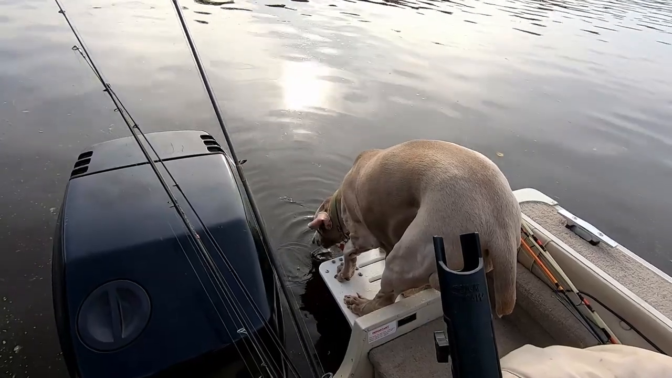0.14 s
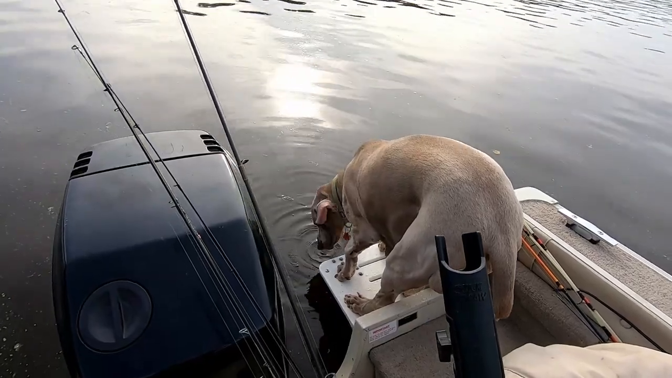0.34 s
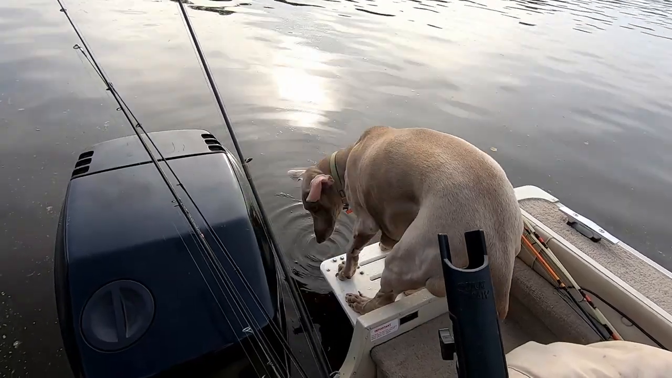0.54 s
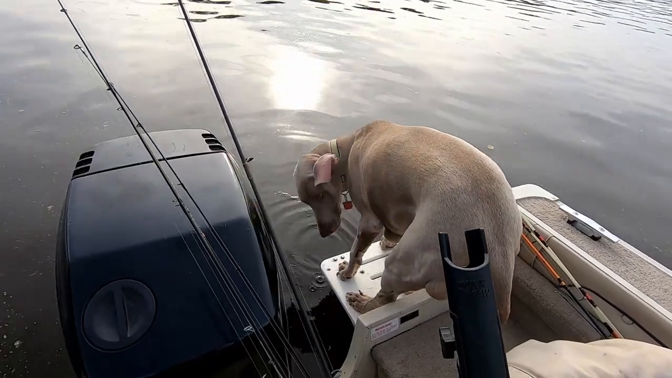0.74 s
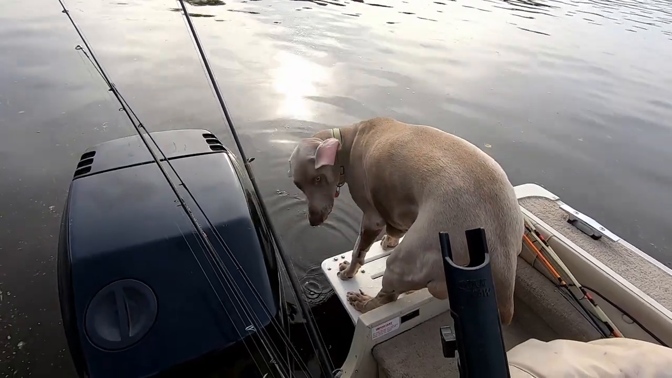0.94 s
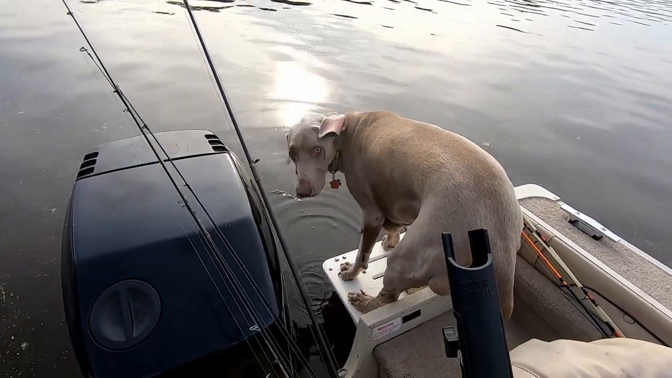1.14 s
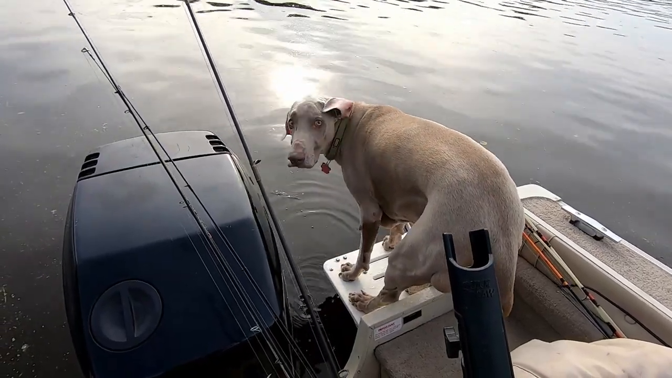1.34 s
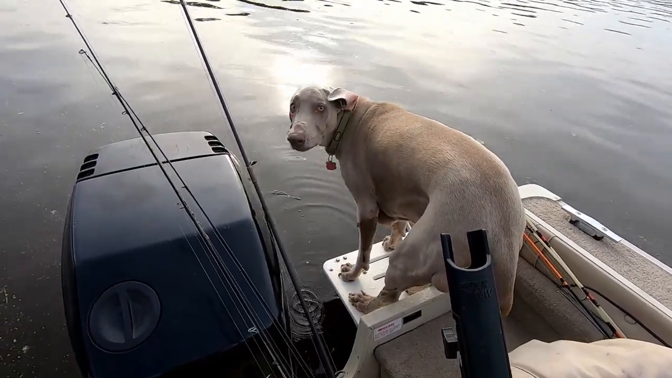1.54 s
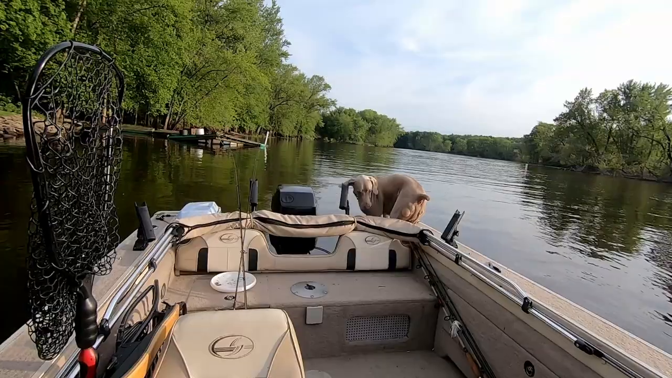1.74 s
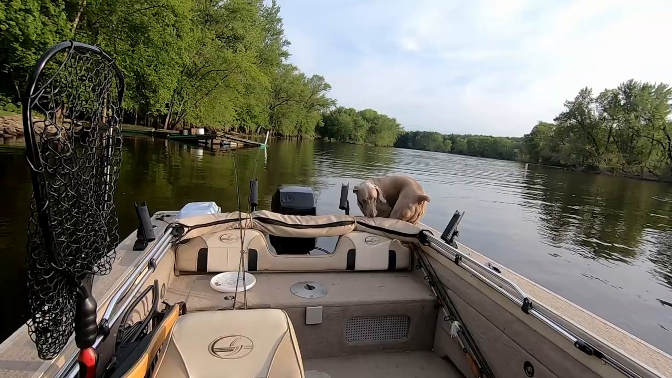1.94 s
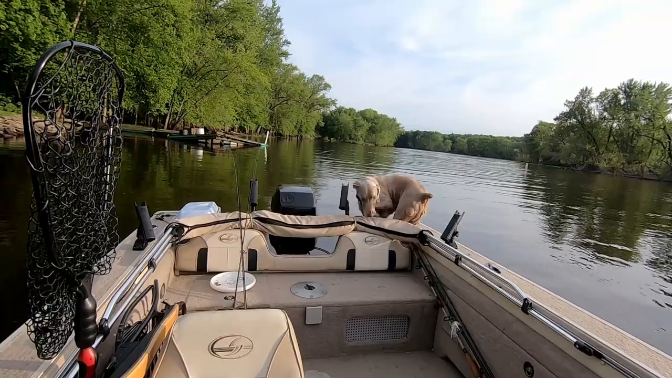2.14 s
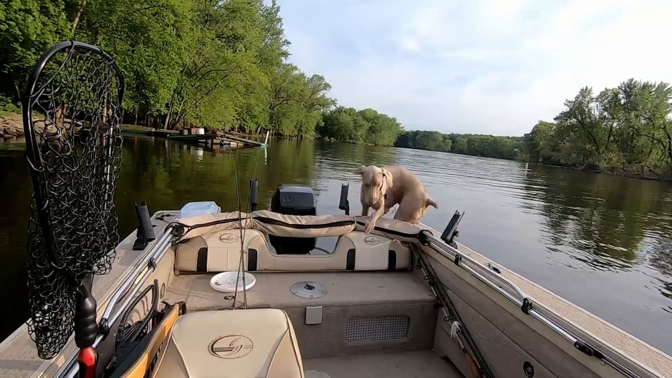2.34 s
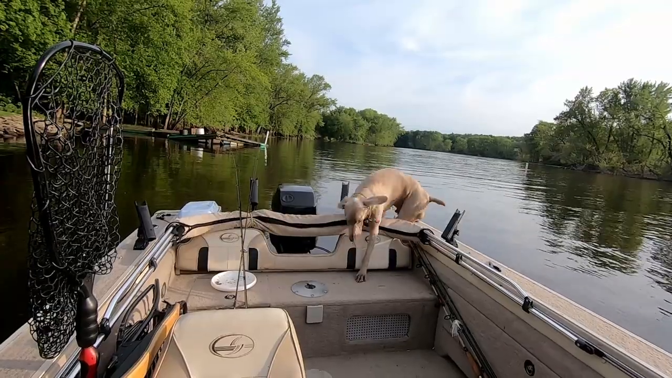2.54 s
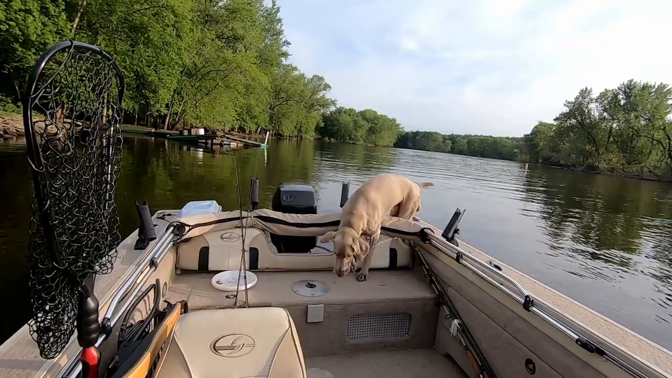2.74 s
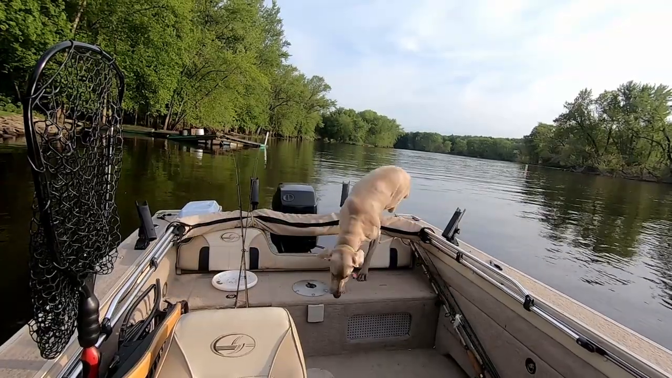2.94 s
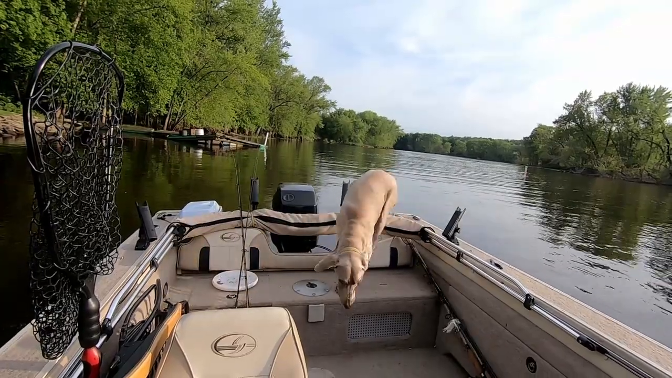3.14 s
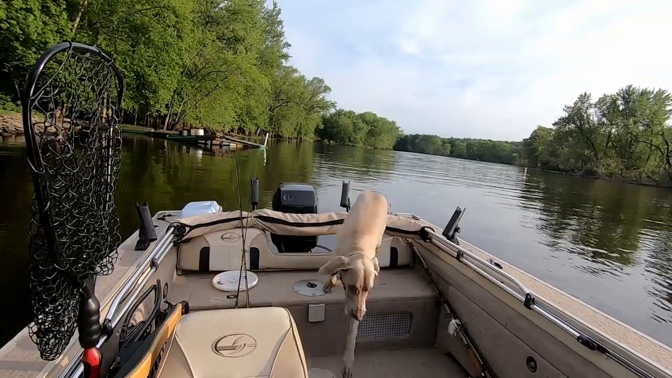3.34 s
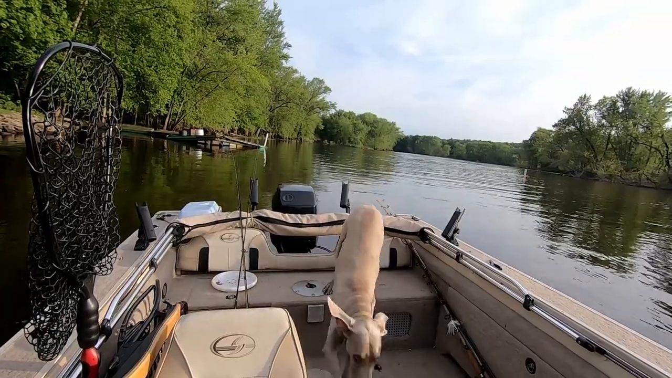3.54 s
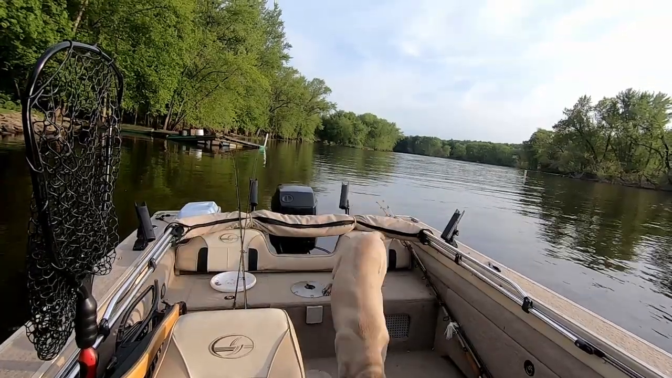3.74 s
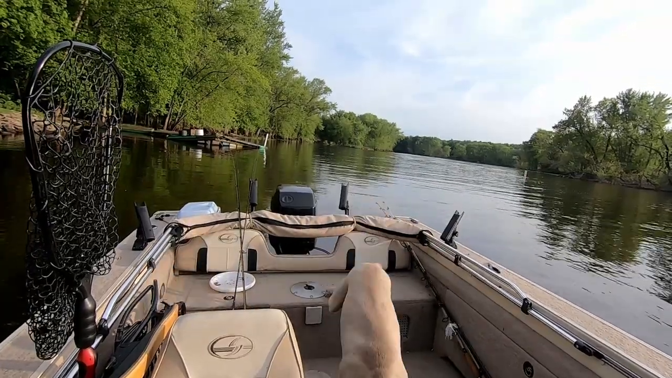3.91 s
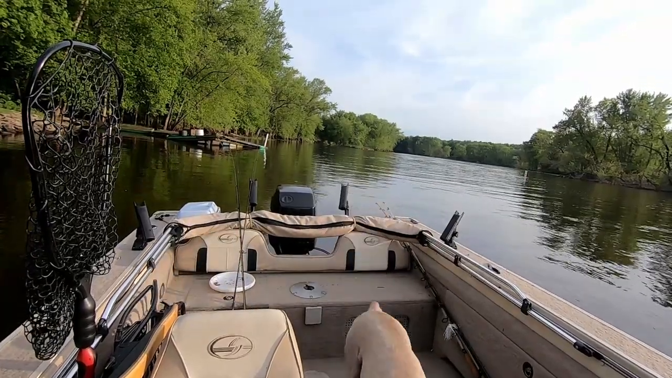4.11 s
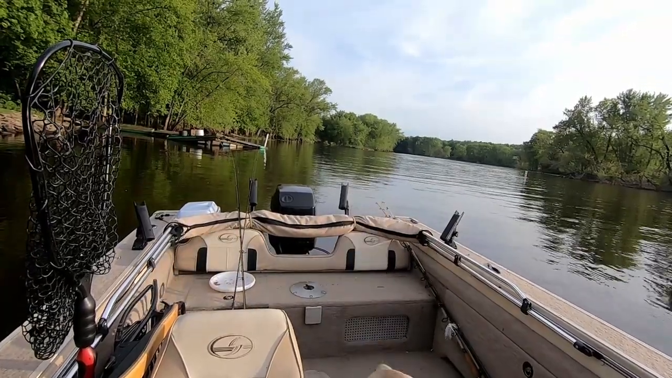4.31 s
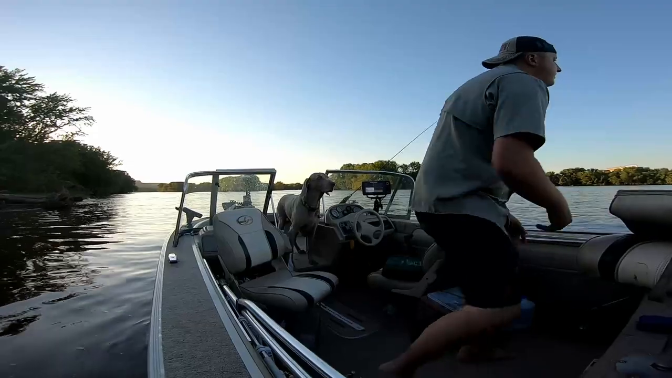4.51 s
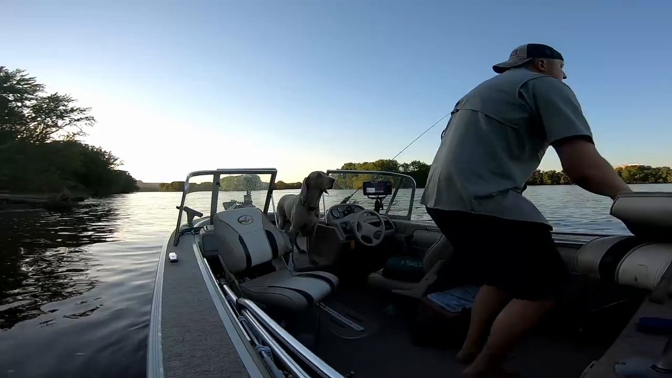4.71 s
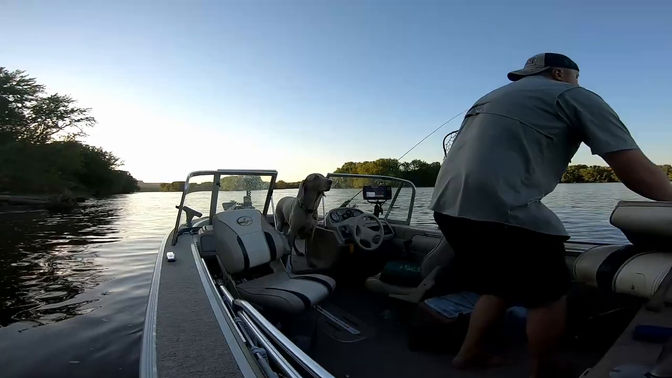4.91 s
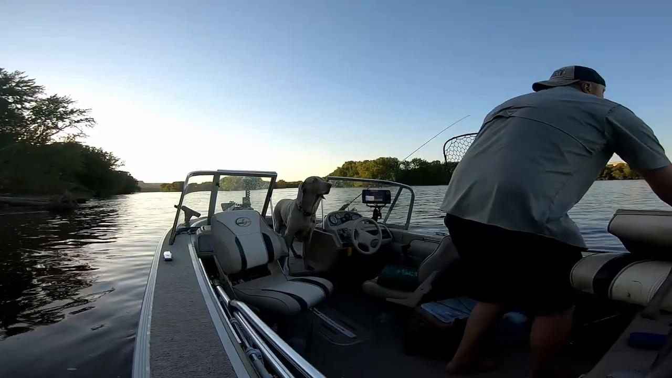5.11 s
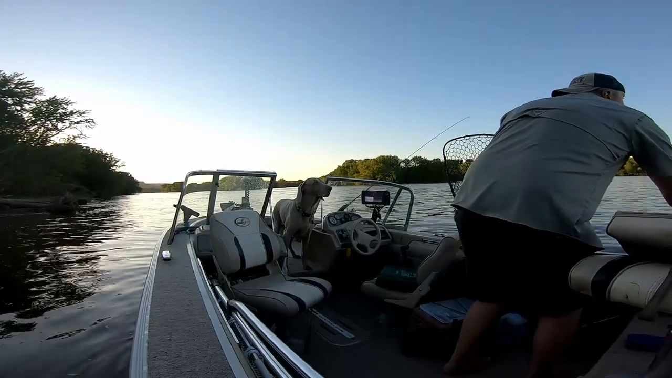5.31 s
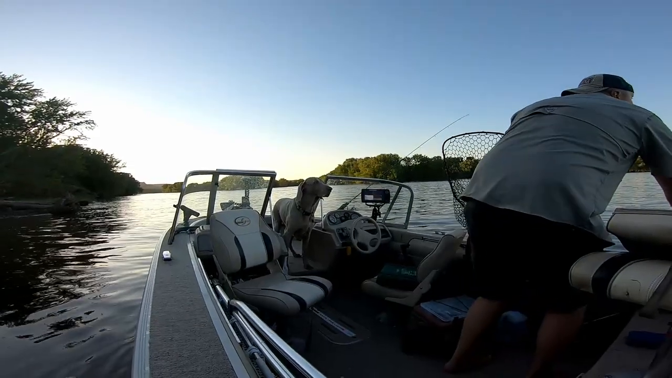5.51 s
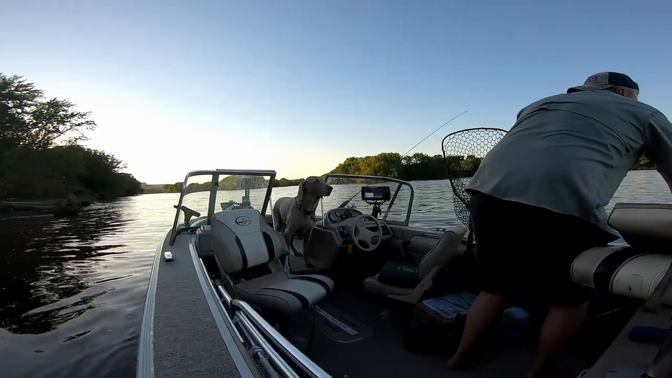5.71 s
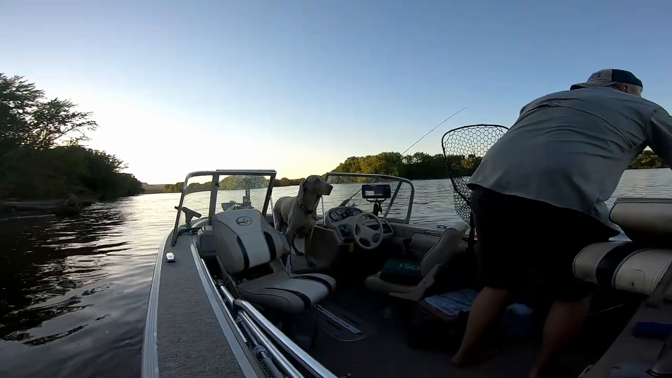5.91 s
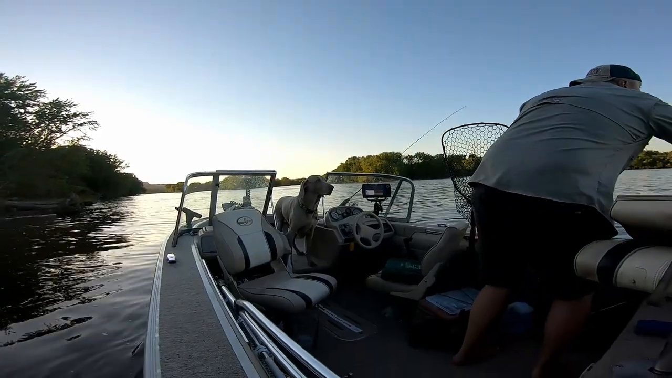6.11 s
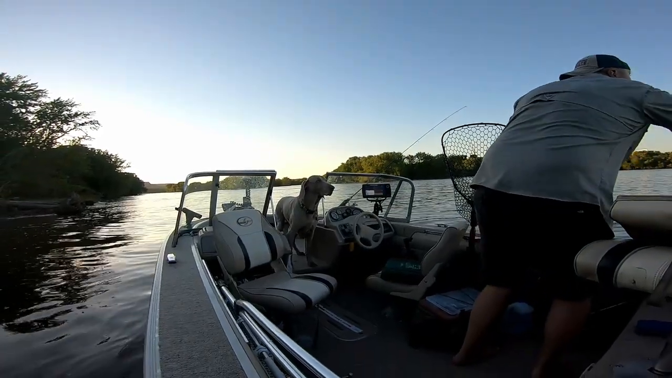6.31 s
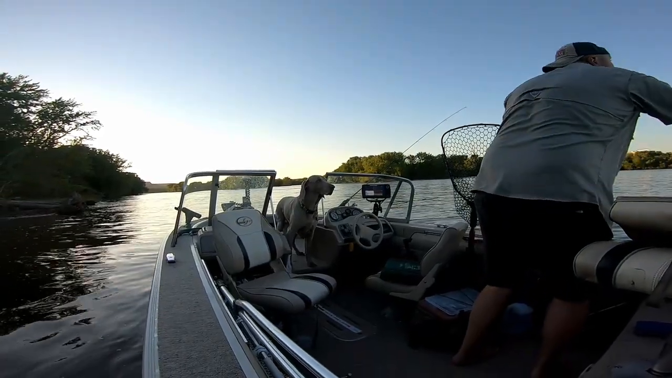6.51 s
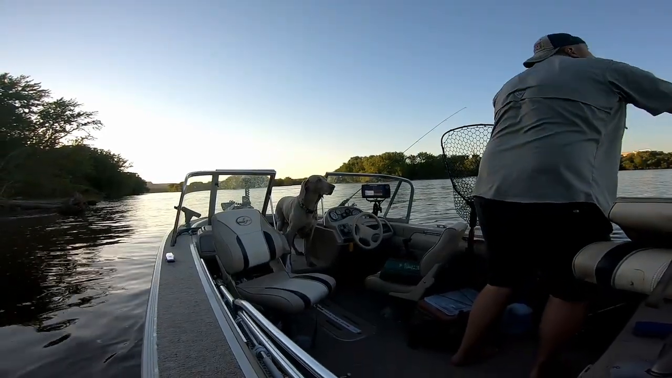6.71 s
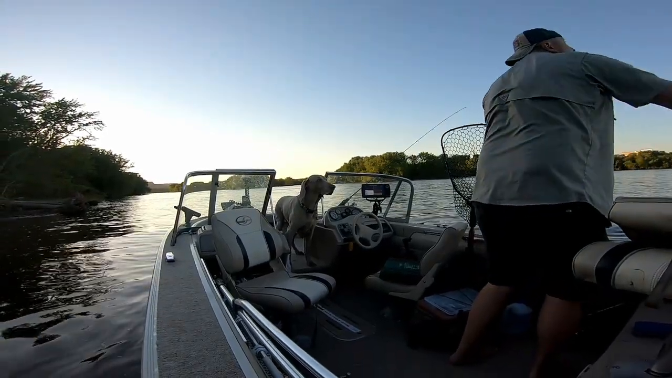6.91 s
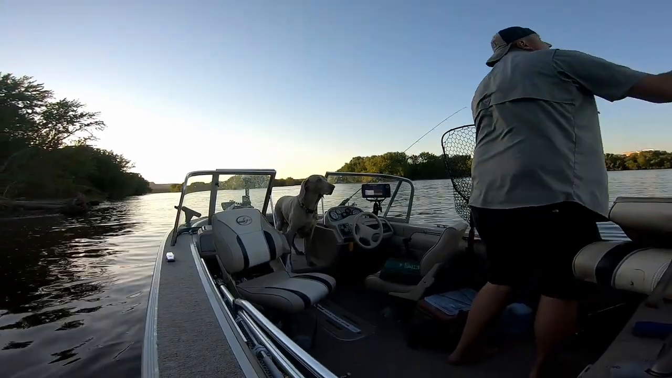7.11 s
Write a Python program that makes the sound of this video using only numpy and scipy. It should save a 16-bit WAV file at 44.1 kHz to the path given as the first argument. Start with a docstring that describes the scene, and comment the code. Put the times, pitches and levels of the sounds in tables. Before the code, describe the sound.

Three outdoor passages joined by hard cuts: small wet bubbles and ticks near a distant-sounding idling motor; a dog jumping down and clattering across hollow boards, tags jingling, paws thumping, with faint birdsong to the right; finally a steady, bassy engine idle, much louder and nearly mono, with a few barely audible gear ticks. Close on-board microphone, little reverberation.

```python
"""A small boat on a river, heard from on board in three passages that follow each other directly.
First a dog laps and drips at the stern (sine bubbles, noise ticks) over an idling outboard (wandering orders).
Then it scrabbles down the deck: noise-and-ring claws, paws on the deck's modes, scrapes and ringing collar tags,
with gliding-sine birds on the banks, insects of narrow noise and a sub-bass lurching of the hull.
Last a louder, closer idle drums through the hull. Shaped noise makes the air, water and hull behind each."""
import sys
import numpy as np
from scipy import signal
from scipy.fft import rfft, irfft
from scipy.io import wavfile
from scipy.ndimage import uniform_filter1d

SR = 44100
rng = np.random.default_rng(int(sys.argv[2]) if len(sys.argv) > 2 else 0)


def put_to_file(sound):
    """Save the sound as 16-bit audio at rate SR, in the file named by the first command-line argument."""
    columns = np.atleast_2d(sound).T  # one column per channel
    safe = np.clip(columns, -1, 1)
    whole_steps = np.round(safe * 32767)
    wavfile.write(sys.argv[1], SR, whole_steps.astype(np.int16))


def convert_level_to_amplitude(level_db):
    """Map a level in decibels to its linear amplitude factor."""
    exponent = np.asarray(level_db, float) / 20
    return 10 ** exponent


N = 315315  # samples

# Bounds of the three passages: times in seconds.
PASSAGES = (0, 1.613, 4.442, 7.15)


def evened(x):
    """Scales to rms 1."""
    return x / np.sqrt(np.mean(x ** 2) + 1e-20)


def read(points, hz):
    """Reads a spectrum on a log-frequency axis."""
    f, value = np.transpose(points)
    return np.interp(np.log(hz + 1), np.log(f + 1), value)


def span(rows, start=None, stop=None):
    """Start time, time axis and columns of a curve, at sample rate."""
    s, *columns = np.transpose(rows)
    start = s[0] if start is None else start
    stop = s[-1] if stop is None else stop
    t = np.arange(start, stop, 1 / SR)
    return t[0], t, [np.interp(t, s, c) for c in columns]


def add(mix, s, sound, pan_db=0):
    """Mixes a sound in at s seconds, left over right by pan_db."""
    part = mix[:, round(s * SR):][:, :sound.shape[-1]]
    part += convert_level_to_amplitude([[pan_db / 2], [-pan_db / 2]]) * sound[..., :part.shape[1]]


def edged(x):
    """Fades both ends over 4 ms."""
    n = np.arange(x.shape[-1])
    fade = np.minimum(n, n[::-1]) / (.004 * SR)
    return x * np.sin(np.pi / 2 * np.clip(fade, 0, 1))


def wander(t, top_hz):
    """Slow chance of rms 1 from sines of random phase, 0.3 Hz up to top_hz."""
    hz = np.geomspace(.3, top_hz, num=16)[:, None]
    coarse = t[::64]
    sines = np.sin(2 * np.pi * (hz * coarse + rng.random(hz.shape)))
    slow = (sines / hz ** .25).sum(0)
    return np.interp(t, coarse, evened(np.tanh(evened(slow))))


def coloured(x, points, lift_db=0):
    """Filters x by a spectrum; lift_db tilts the treble, nearing that many dB per octave above 3 kHz."""
    hz = np.fft.rfftfreq(len(x), 1 / SR)
    return irfft(rfft(x) * convert_level_to_amplitude(read(points, hz) + lift_db * np.log2(1 + hz / 3000)), len(x))


def bumpy(x, low_hz, count, spread_db):
    """Gives x a random colour of its own, up to 14 kHz."""
    bumps = np.transpose([np.geomspace(low_hz, 14000, num=count), spread_db * rng.standard_normal(count)])
    return coloured(x, bumps)


def fuzzy(t, hz, width):
    """Noise smoothed to the width in Hz and shifted up to the pitch, rms 1."""
    r = np.exp(-np.pi * width / SR)
    noise = rng.standard_normal((2, len(t) + SR // 2))
    slow = signal.lfilter([1], np.convolve([1, -r], [1, -r]), noise)[:, SR // 2:]  # drops the settling
    return evened(((slow[0] + 1j * slow[1]) * np.exp(2j * np.pi * hz * t)).real)


# Claws on the deck, close by; the bright ones from 2.16 to 2.53 s are collar tags clinking.
# Each row: start in seconds, level in dB, ring in Hz, treble tilt in dB per octave, ring level in dB.
CLAWS = [(1.775, -50, 2810, -3, 6.5), (2.005, -50, 2180, 3.5, 0), (2.163, -44.5, 3517, 12.5, 7.5),
         (2.2069, -37.5, 3554, 15.5, 4.5), (2.3436, -46, 3523, 8, 5), (2.363, -46, 4327, 4.5, 8.5),
         (2.394, -40.5, 2400, 3.5, -5), (2.4279, -43.5, 3930, 9.5, 5), (2.4771, -40.5, 3060, -2.5, 2.5),
         (2.5254, -42.5, 3273, 11.5, 0.5), (2.7756, -32, 3600, -7.5, -2.5), (2.793, -32, 3770, 1, 0.5),
         (2.824, -31.5, 2797, 1.5, 2.5), (2.843, -30.5, 2403, -1.5, -1.5), (2.8799, -28.5, 3244, -5, -0.5),
         (2.8845, -28, 4427, -1, 4), (2.904, -19, 3605, 5.5, -2.5), (2.9435, -30.5, 4760, 0, 3),
         (2.9641, -13, 3640, 3.5, 3.5), (2.9843, -21.5, 4560, -0.5, -7), (2.9912, -18.5, 3140, -2, 1.5),
         (3.0004, -16, 3002, 3.5, 1), (3.0195, -20.5, 2455, 4, 0), (3.0305, -22.5, 3453, -2, -9),
         (3.0589, -30, 1987, -4, 3), (3.0895, -33.5, 2947, -6, -8), (3.1068, -23.5, 2388, -8, 1),
         (3.1396, -27.5, 2457, -4, -9), (3.1556, -12, 5860, 6.5, 3), (3.1787, -16, 2404, 0.5, -0.5),
         (3.2121, -18, 2371, 1.5, -4.5), (3.2331, -20.5, 3213, 2.5, 2.5), (3.2484, -28, 3304, 3, 5.5),
         (3.2975, -20, 3985, 2.5, -0.5), (3.3475, -24, 4024, 6.5, 1.5), (3.363, -26, 3237, 5, -2.5),
         (3.4, -25.5, 2960, 0.5, 7), (3.4282, -34, 3574, 1, 2), (3.463, -35.5, 3126, 8, 6),
         (3.492, -45, 3940, -4.5, -4), (3.5103, -42, 3070, -4.5, -6), (3.5474, -41, 2267, -2, -9),
         (3.564, -35.5, 3350, 5, 3.5), (3.706, -43.5, 3345, 13, -5.5), (3.7594, -42, 2841, 2, -0.5),
         (3.9685, -41.5, 3950, -16.5, -13.5), (4.0285, -39, 3023, -7, -16), (4.147, -43, 3110, -4, 0.5),
         (4.2045, -28.5, 2108, 1.5, -0.5), (4.2574, -48.5, 2104, 4, 0), (4.2897, -47, 3143, 0, -3.5),
         (4.4344, -48.5, 2176, 0, 2)]
# Colour of claw on deck, lent to scrapes and wet ticks too. Each row: frequency in Hz, level in dB.
NAIL = [(290, -40), (500, -4.5), (657, -15.5), (792, -6.5), (1510, -5.5), (2360, 1.5), (5350, -3.5),
        (5920, -4.5), (12000, -29.5), (14400, -45.5), (15500, -57)]


def claw(db, hz, treble_db, ring_db):
    """A sharp crack, short rings, three weak bounces, and a duller tail off the boat's sides."""
    t = np.arange(4096) / SR
    bounce_s, bounce, ratio = rng.random((3, 3, 1))
    late = t - .002 - .011 * bounce_s
    fall = 1.27 * convert_level_to_amplitude(-60 * t / .007) + .3 * convert_level_to_amplitude(-60 * t / 0.028)
    fall = fall + (.5 * bounce * (late > 0) * convert_level_to_amplitude(-60 * abs(late) / 0.0188)).sum(0)
    direct, *sides = rng.standard_normal((3, len(t)))
    direct = evened(bumpy(coloured(direct, NAIL, treble_db), 800, 16, 3.5))
    tail = np.array([evened(coloured(v, NAIL, treble_db - 2)) for v in sides]) * convert_level_to_amplitude(-60 * t / 0.1)
    ring = np.sin(2 * np.pi * hz * t) + .5 * np.sin(2 * np.pi * hz * (.6 + 1.2 * ratio) * t).sum(0)
    ring = ring * convert_level_to_amplitude(ring_db - 60 * t / 0.0205)
    ring = ring + fuzzy(t, 1853, 150) * convert_level_to_amplitude(-17 - 60 * t / .06)  # a deck panel rings after each claw
    return convert_level_to_amplitude(db) * (1 - np.exp(-t / .0003)) * (0.458 * direct * fall + 0.404 * ring + 0.13 * tail)


# Paws landing on the boards. Each row: start in seconds, level in dB, hardness in dB, weight in dB.
PAWS = [(2.587, -16.5, 1, 2.5), (2.825, -27.5, 6, 2), (2.985, -12.5, 1.5, -10), (2.996, -14, 1, -21.5),
        (3.059, -25, 5.5, -6), (3.122, -6, -13, -14), (3.189, -25.5, 8, 3.5), (3.297, -14, 0, 4),
        (3.549, -12.5, 0, 5), (3.596, -12, 4.5, 6.5), (3.706, -15.5, -1, 4.5), (3.745, -32.5, -4.5, 1.5),
        (3.858, -41.5, 2, 15.5), (4.044, -20, 2.5, -4.5), (4.062, -24, 8, 2.5), (4.089, -29, -5, 16),
        (4.144, -16, -1, -1), (4.291, -11, -1, 5), (4.349, -32, 4, 15)]
# Modes of the hollow deck. Each row: pitch in Hz, level in dB, 60 dB decay in seconds, rise in seconds.
DECK = [(41.04, -8.5, 0.237, .04), (61.57, -4, 0.285, 0.0243), (95, -6.5, 0.17, 0.021),
        (147.88, 0.5, 0.128, 0.0035), (208.3, -4.5, 0.0974, 0.00533), (293.3, -14.5, 0.0866, 0.0024),
        (416, -13.5, 0.051, 0.0016), (588, -17.5, 0.0483, 0.00155), (771, -28, 0.0534, 0.00088),
        (1257.5, -25, 0.025, .001)]


def paw(db, hard_db, weight_db):
    """The deck's modes: high ones answer at once, low ones swell later; weight feeds the lowest."""
    t = np.arange(16000) / SR
    hz, mode_db, t60, rise = np.transpose(DECK)[..., None]
    detune, phase = rng.random((2, len(DECK), 1))
    mode_db = mode_db + hard_db * np.maximum(np.log2(hz / 150), 0)
    mode_db = mode_db + weight_db * np.maximum(np.log2(150 / hz), 0)
    ring = np.sin(2 * np.pi * (hz * (0.9188 + 0.182 * detune) * t + .5 * (phase > .5)))  # random sign
    modes = (convert_level_to_amplitude(mode_db - 60 * t / t60) * (1 - np.exp(-t / rise)) ** 2 * ring).sum(0)
    # the soft pad's dull puff
    band = signal.butter(3, [220, 800], "band", fs=SR, output="sos")
    puff = evened(signal.sosfilt(band, rng.standard_normal(len(t))))
    puff = convert_level_to_amplitude(2 * hard_db - 22.5 - 60 * t / 0.0766) * (1 - np.exp(-t / 0.001)) * puff
    # bending waves: the low ones arrive last
    sag = np.sin(2 * np.pi * np.cumsum(48 + 150 * np.exp(-t / 0.01766)) / SR)
    sag = convert_level_to_amplitude(weight_db + 1.5 - 60 * t / 0.21) * (1 - np.exp(-t / 0.0171)) * sag
    return 0.4613 * convert_level_to_amplitude(db) * (modes + puff + sag)


# Dragging feet, one list per drag. Each row: time in seconds, level in dB.
SCRAPES = [
    [(2.14, -59.5), (2.26, -61)],
    [(2.74, -68.5), (2.84, -46.5), (2.87, -57.5), (2.95, -59.5), (3.0, -35), (3.04, -40), (3.085, -62),
     (3.14, -56.5), (3.18, -41), (3.205, -58), (3.245, -45), (3.28, -64), (3.33, -57), (3.37, -49.5),
     (3.39, -58.5), (3.53, -61.5)],
    [(3.94, -80.5), (4.002, -54), (4.09, -62)],
]


def scrape(rows):
    """Dense tiny catches of nail and pad on the textured deck, each with a brief ring of its own pitch."""
    s, t, (db,) = span(rows)
    struck = rng.random(len(t)) < 900 / SR  # about 900 catches a second
    catches = convert_level_to_amplitude(2.5 * np.minimum(rng.exponential(1, len(t)), 5)) * struck
    grip = signal.lfilter([1], [1, -np.exp(-1 / (.001 * SR))], catches) + 0.34
    shared, left, right = (coloured(v * grip, NAIL) for v in rng.standard_normal((3, len(t))))
    kind = rng.integers(0, 16, len(t))
    cycles = np.arange(512) * np.geomspace(700, 7000, num=16)[:, None] / SR
    pings = np.sin(2 * np.pi * cycles) * cycles * np.exp(-cycles / 3.0)
    rings = sum(signal.oaconvolve(catches * (kind == k), ping)[:len(t)] for k, ping in enumerate(pings))
    rings = coloured(rings, NAIL)
    both = evened(evened(shared) + .8 * evened(rings) + .45 * evened(np.array([left, right])))
    return s, convert_level_to_amplitude(db) * both * signal.windows.tukey(len(t), .1)


# Collar tags shaken. Each row: start in seconds, level in dB.
JINGLES = [(0.6479, -65), (0.7543, -63), (0.8149, -47.5), (0.8281, -40), (1.6428, -59), (2.1631, -51),
           (2.1834, -45), (2.2094, -46), (2.3438, -46.5), (2.3845, -50), (2.4108, -51.5), (2.4284, -50),
           (2.4579, -50), (2.5444, -46.5), (2.5554, -54.5), (2.8266, -43.5), (2.9628, -36.5), (3.0494, -56),
           (3.2121, -45), (3.2981, -45.5), (3.3448, -45), (3.4382, -58)]
# Modes of the tags' thin metal. Each row: pitch in Hz, level in dB, 60 dB decay in seconds.
TAG = [(3600, -8, 0.21), (6190, 1, 0.0719), (6740, 3, 0.0135), (7500, -2, 0.02), (8320, -5.5, 0.0276),
       (10050, 3, 0.0939), (10800, 1.5, 0.0071), (11650, 0, 0.0475), (12420, -3.5, 0.0563),
       (13210, -11, 0.0244), (13960, -12.5, 0.0437)]


def jingle(db):
    """The tags knock together: a thin rattle, and a different mix of their modes at each shake."""
    t = np.arange(8000) / SR
    hz, mode_db, t60 = np.transpose(TAG)[..., None]
    share, detune = rng.standard_normal((2, len(TAG), 1))
    tone = np.sin(2 * np.pi * hz * (1 + .008 * detune) * t)
    ring = (convert_level_to_amplitude(mode_db + 4.4 * share - 60 * t / t60) * tone).sum(0)
    thin = signal.butter(3, [6000, 13000], "band", fs=SR, output="sos")
    rattle = evened(signal.sosfilt(thin, rng.standard_normal((2, len(t))))) * convert_level_to_amplitude(0.5 - 60 * t / 0.092)
    return 0.39 * convert_level_to_amplitude(db) * (ring + rattle) * (1 - np.exp(-t / 0.00092))


# The hull lurches under the dog. Each row: time of the peak in seconds, level in dB.
LURCHES = [(2.68, -31.5), (2.96, -23.5), (3.34, -40), (3.63, -26), (3.76, -33), (4.1, -25.5), (4.39, -30)]


def rocking():
    """Lumpy sub-bass noise swelling at each lurch, partly unrelated at the two microphone ports."""
    t = np.arange(PASSAGES[1], PASSAGES[2], 1 / SR)
    at, db = np.transpose(LURCHES)[..., None]
    rise_db_per_s, fall_db_per_s = 130, 90
    level = convert_level_to_amplitude(db - np.maximum(rise_db_per_s * (at - t), fall_db_per_s * (t - at))).sum(0)
    sub = signal.butter(3, [16, 42], "band", fs=SR, output="sos")
    shared, left, right = signal.sosfilt(sub, rng.standard_normal((3, len(t))))
    return t[0], edged(level * evened(shared + .5 * np.array([left, right])))


# The dog is off to one side of the microphone ports. Each row: frequency in Hz, left's lead in radians.
PORT_LEAD = [(100, 1.5), (780, -0.17), (1290, 2), (1810, 1), (2670, 0.66), (3960, -1.45), (5000, -1.35),
             (7320, -1), (10000, -3), (15000, -6)]
# The same in level. Each row: frequency in Hz, left over right in dB.
PORT_LEVEL = [(60, -3.5), (150, 1), (380, 0.5), (950, -11), (2380, -6), (5980, -3.5), (15000, -1.5)]


def ports(x):
    """Level and phase gap between the two microphone ports for a source off to one side."""
    hz = np.fft.rfftfreq(N, 1 / SR)
    gap = convert_level_to_amplitude(read(PORT_LEVEL, hz) / 2) * np.exp(.5j * read(PORT_LEAD, hz))
    return irfft(rfft(x) * np.array([gap, 1 / gap]), N)


# Drips and laps at the stern. Each row: start in seconds, level in dB, bubble in Hz,
# tick over the bubble in dB, treble tilt in dB per octave.
DRIPS = [(0.079, -43.5, 1355, -10.5, -6.5), (0.082, -59, 7000, -12.5, 0), (0.088, -46.5, 1274, -15, -3.5),
         (0.154, -46, 1157, -6.5, -5.5), (0.167, -38, 684, 2.5, -3.5), (0.168, -45.5, 3994, -8, 1),
         (0.184, -50, 2007, 1, -3.5), (0.232, -50, 662, 9, 6), (0.263, -48, 690, 1.5, 2.5),
         (0.289, -49, 3430, -11, -1.5), (0.314, -30, 1195, -5.5, -7), (0.327, -33, 3230, -5.5, -10.5),
         (0.486, -46.5, 3750, -12.5, 3), (0.55, -39.5, 1394, -4, 0.5), (0.554, -41, 3184, -1.5, 0),
         (0.556, -47.5, 6210, -11, 0), (0.586, -42.5, 2744, -0.5, -3.5), (0.599, -41.5, 3443, 0, -4.5),
         (0.628, -44.5, 3150, -5, -0.5), (0.68, -42.5, 3063, -2.5, -1), (0.703, -41.5, 3440, 4.5, -1.5),
         (0.705, -50.5, 5970, -9.5, 0), (0.732, -50, 711, 7, 6), (0.815, -49, 615, 7, 8.5),
         (0.829, -42, 3565, -2, 2), (0.966, -45.5, 2127, -2, -8), (1.007, -45, 613, 2, -6),
         (1.022, -38.5, 808, 0, -9.5), (1.095, -47.5, 3437, -12.5, -1), (1.167, -38.5, 3549, 8, -10),
         (1.201, -38.5, 2313, -6.5, -14.5), (1.261, -44.5, 743, -4.5, -7.5),
         (1.279, -33, 758.5, -9.5, -25.5), (1.293, -44.5, 1296, -6.5, -18.5), (1.418, -47, 2400, -13, -10),
         (1.504, -45.5, 636, 6, -9.5), (1.51, -42.5, 3214, 0, -8), (1.539, -45, 2697, 0, 1),
         (1.564, -45, 708, 2.5, -3), (4.368, -39, 1336, -9.5, 0.5)]


def drip(db, hz, tick_db, treble_db):
    """A short wobbling bubble of rising pitch and the ragged wet tick that made it."""
    t = np.arange(4096) / SR
    wobble, rag, *noises = rng.standard_normal((5, len(t)))
    wobble = 0.0753 * evened(uniform_filter1d(wobble, size=90))
    turns = np.cumsum(hz * (1 + 2.2 * t + wobble)) / SR
    bubble = np.sin(2 * np.pi * turns) * convert_level_to_amplitude(-60 * t / 0.0406) * (1 - np.exp(-t / 0.00136))
    rag = convert_level_to_amplitude(2.7 * evened(uniform_filter1d(rag, size=60)))
    # each splash has its own colour, the same in all three noises
    bumps = np.transpose([np.geomspace(600, 14000, num=20), 5.1 * rng.standard_normal(20)])
    shared, left, right = (evened(coloured(coloured(v, NAIL, treble_db), bumps)) for v in noises)
    tick = shared * convert_level_to_amplitude(-60 * t / 0.0493) + 0.17 * np.array([left, right]) * convert_level_to_amplitude(-60 * t / 0.24)
    tick = 0.401 * convert_level_to_amplitude(tick_db) * tick * rag * (1 - np.exp(-t / .001))
    return convert_level_to_amplitude(db) * (bubble + tick)


# Water running off the muzzle. Each row: time in seconds, level in dB.
TRICKLE = [(0, -68.5), (.3, -67.5), (.45, -78), (.57, -65.5), (.8, -70), (.88, -57.5), (.95, -69.5),
           (1.02, -55), (1.18, -55.5), (1.32, -79), (1.48, -74), (1.61, -57.5)]


def trickle():
    """Many tiny bubbles of every size, a few cycles each."""
    s, t, (db,) = span(TRICKLE, *PASSAGES[:2])
    born = rng.random(len(t)) < 1600 / SR  # about 1600 bubbles a second
    size = convert_level_to_amplitude(4.0 * np.minimum(rng.exponential(1, len(t)), 4)) * born
    kind = rng.integers(0, 24, len(t))
    out = np.zeros((2, len(t)))
    for k, hz in enumerate(np.geomspace(480, 8000, num=24)):
        cycles = np.arange(0, 24, hz / SR)
        bubble = np.sin(2 * np.pi * cycles * (1 + 0.0034 * cycles)) * cycles * np.exp(-cycles / 2.5)
        out[k % 2] += signal.oaconvolve(size * (kind == k), bubble * (hz / 1000) ** -.1)[:len(t)]
    out = out + .7 * out[::-1]
    local_rms = np.sqrt(uniform_filter1d((out ** 2).mean(0), size=8820) + 1e-9)
    return s, edged(convert_level_to_amplitude(db - 4.0) * out / local_rms)


# A faint rough squeak, perhaps the dog whining: start and end in seconds.
SQUEAK_S = (1.025, 1.15)
# Its start pitch in Hz, end pitch in Hz, level in dB.
SQUEAK = (730, 680, -63.5)
# Its harmonics from the first up: level in dB.
SQUEAK_HARMONICS = (-1.5, 1, -7.5, -9, 0)


def squeak(start_hz, end_hz, db):
    """Harmonics of one unsteady pitch, each coming and going."""
    t = np.arange(*SQUEAK_S, 1 / SR)
    slow = uniform_filter1d(rng.standard_normal((6, SR)), size=220)[:, :len(t)]
    shake, *flicker = (evened(v) for v in slow)
    turns = np.cumsum(np.linspace(start_hz, end_hz, num=len(t)) * (1 + .025 * shake)) / SR
    tone = sum(convert_level_to_amplitude(part_db + 6.0 * flicker[k]) * np.sin(2 * np.pi * (k + 1) * turns)
               for k, part_db in enumerate(SQUEAK_HARMONICS))
    return t[0], convert_level_to_amplitude(db) * tone * signal.windows.tukey(len(t), .3)


# Idling engine, one list far off and one near.
# Each row: time in seconds, fifth order in Hz, level in dB.
IDLE = [
    [(0.0, 148.8, -43.5), (0.8, 148.9, -40.5), (1.61, 148.9, -39.5)],
    [(4.44, 164.8, -29), (4.9, 164.9, -29.5), (5.4, 165.0, -23), (6.0, 163.6, -24), (6.68, 163.5, -25),
     (6.8, 160.7, -26.5), (7.03, 161.3, -24.5), (7.15, 157.3, -23.5)],
]
# Orders of each engine. Each row: multiple of the firing rate, relative level in dB, wander in dB.
ORDERS = [
    [(2, -11.5, -3), (3, -8, 0.5), (4, -11.5, -8), (5, 1, -1.1), (6, -24.5, 1.5), (8, -24.5, 2),
     (10, -25, 2.5)],
    [(2, -10, 5.5), (3, -8.5, -1.5), (4, -22.5, -8), (5, 0.5, 1.56), (6, -18, 7), (8, -27.5, 3),
     (9, -27, 3), (10, -27, 2), (11, -27, 2.5), (12, -30, 3.5), (14, -31.5, 4.5), (17, -36, 6)],
]


def engine(rows, orders, start, stop):
    """Orders of the firing rate as sines, each swelling and sinking as the firings differ."""
    s, t, (fifth_hz, db) = span(rows, start, stop)
    turns = np.cumsum(fifth_hz * (1 + .003 * wander(t, 12))) / (5 * SR)
    tone = sum(convert_level_to_amplitude(order_db + loose_db * wander(t, 12)) * np.sin(2 * np.pi * (k * turns + rng.random()))
               for k, order_db, loose_db in orders)
    return s, edged(np.sqrt(2) * convert_level_to_amplitude(db) * tone)


# Faint ticks of gear beside the near engine. Each row: start in seconds, level in dB.
TICKS = [(4.5794, -50.5), (4.9594, -51), (5.1794, -49.5), (5.8832, -45.5)]
# Their one colour: ring in Hz, treble tilt in dB per octave, ring level in dB.
TICK_COLOUR = (2300, 1, -2)


def gear_tick(db):
    """A hard knock built like a claw's: crack, ring and tail."""
    return claw(db, *TICK_COLOUR)


def note(hz, db):
    """A near-sine whistle along a pitch curve, fluttering with distance."""
    slow = uniform_filter1d(rng.standard_normal((2, SR // 4)), size=120)[:, :len(hz)]
    shake, flutter = (evened(v) for v in slow)
    tone = np.sin(2 * np.pi * np.cumsum(hz * (1 + .006 * shake)) / SR) * convert_level_to_amplitude(2.5 * flutter)
    n = np.arange(len(hz))
    fade = np.minimum(n, n[::-1]) / (0.0038 * SR)
    return np.sqrt(2) * convert_level_to_amplitude(db) * tone * np.sin(np.pi / 2 * np.minimum(fade, 1)) ** 2


def banks(x):
    """Diffuse echo from trees on the banks, different in each channel."""
    t = np.arange(SR // 2) / SR
    tail = rng.standard_normal((2, len(t))) * convert_level_to_amplitude(-60 * t / 0.24) * (t > .012)  # first return after 12 ms
    return signal.fftconvolve(x, tail / np.linalg.norm(tail[0]), axes=1)[:, :N]


# Distant bird notes. Each row: start in seconds, length in seconds, start pitch in Hz,
# end pitch in Hz, level in dB.
NOTES = [(1.689, 0.023, 4383, 3936, -55), (1.725, .012, 3685, 4165, -63.5),
         (1.712, .015, 2800, 3210, -58.5), (1.81, 0.05, 3400, 2978, -62), (1.868, 0.024, 3960, 4607, -57),
         (1.893, 0.02, 3746, 4150, -56), (1.922, .02, 3600, 4000, -58), (1.915, .03, 3298, 3027, -59.5),
         (1.946, .025, 3017, 3398, -60), (1.97, 0.017, 3331, 2902, -58), (2.1, .055, 3747, 3796, -61.5),
         (2.14, 0.024, 3518, 2900, -59), (2.202, 0.036, 3665, 3405, -58), (2.252, 0.038, 3148, 2955, -61),
         (2.424, 0.042, 3947, 3650, -61), (2.462, .03, 2942, 3098, -64.5), (2.61, .03, 3324, 3134, -64),
         (2.73, .065, 3979, 3694, -60), (2.785, .035, 3102, 2922, -56), (3.967, 0.048, 3990, 3548, -59),
         (4.012, .036, 3151, 2847, -53.5), (5.08, 0.12, 2560, 2440, -59), (6.333, .022, 5384, 5570, -67)]
# One warble. Each row: time in seconds, pitch in Hz, level in dB.
WARBLE = [(3.795, 2491, -65), (3.813, 4563, -60.5), (3.832, 4754, -62), (3.846, 3460, -55),
          (3.862, 3050, -61), (3.887, 2949, -60), (3.904, 3536, -57.5), (3.914, 3003, -60.5),
          (3.94, 2920, -68.5)]


def birdsong():
    """Gliding notes, a warble and a high trill of like notes, with their echo."""
    birds = np.zeros((2, N))
    for s, length, start_hz, end_hz, db in NOTES:
        add(birds, s, note(np.linspace(start_hz, end_hz, num=round(length * SR)), db))
    s, _, (hz, db) = span(WARBLE)
    add(birds, s, note(uniform_filter1d(hz, size=150), db))
    trill_s, gap_s, note_s, top_hz, arch_hz, trill_db = 1.695, .0945, 0.033, 7070, 399.2, -64.5
    arch = np.linspace(-1, 1, num=round(note_s * SR)) ** 2  # each note is an arch of pitch
    for k in range(8):
        add(birds, trill_s + k * gap_s, note(top_hz - arch_hz * arch, trill_db))
    birds = birds * convert_level_to_amplitude([[-2.0], [2.0]])  # to the right
    return birds + convert_level_to_amplitude(-3) * banks(birds)


# Insects. Each row: time in seconds, high band in dB, low band in dB.
BUZZ = [(1.61, -67.5, -77), (1.8, -71, -62.5), (2.34, -70.5, -63.5), (2.6, -83, -65.5), (3.3, -82.5, -62.5),
        (3.7, -91, -74.5), (4.44, -82.5, -69)]
# Their bands, high then low. Each row: centre in Hz, width in Hz.
BUZZ_BANDS = [(7000, 350), (1801, 140)]


def insects():
    """Two fuzzy bands, wide across the river."""
    s, t, levels_db = span(BUZZ, *PASSAGES[1:3])
    return s, edged(sum(convert_level_to_amplitude(db) * np.array([fuzzy(t, *band), fuzzy(t, *band)])
                        for db, band in zip(levels_db, BUZZ_BANDS)))


# Air, water and hull noise, one list per passage. Each row: frequency in Hz, relative level in dB per Hz.
AIR = [
    [(12, -66), (20, -28), (59, -0.5), (103, -6), (153, 1), (175, -10.5), (202, -22), (315, -17.5),
     (581, -38), (1270, -41.5), (1870, -48), (3960, -44.5), (7950, -65.5), (10500, -84), (15500, -82.5)],
    [(12, -33.5), (20, -3), (76, -0.5), (148, -2), (519, -26), (746, -27), (1200, -34), (1580, -27.5),
     (1770, -26.5), (2540, -32.5), (3850, -31), (5380, -43), (6910, -41.5), (7730, -48.5), (15500, -79)],
    [(12, -30), (20, 0.5), (59, -5.5), (87, -0.5), (119, -5.5), (171, -5), (238, -12), (274, -15),
     (427, -23), (478, -20), (581, -27), (3000, -43.5), (9390, -75), (10800, -102), (15500, -99)],
]
# Its stereo width, one list per passage. Each row: frequency in Hz, side over mid in dB.
WIDTH = [
    [(60, -7), (110, -19), (200, -13), (380, -6.5), (700, 4), (1290, 2.5), (2380, -5), (4400, -10.5),
     (8120, 3.5), (15000, -18)],
    [(60, -12.5), (110, -14), (200, -14.5), (380, -9), (700, 0.5), (1290, -0.5), (2380, -6), (4400, -4.5),
     (8120, 3), (15000, 3)],
    [(60, -51), (110, -44), (200, -60), (380, -43), (700, -37.5), (1290, -36), (2380, -33.5), (4400, -24.5),
     (8120, -9), (15000, 7.5)],
]
# Its balance, one list per passage. Each row: frequency in Hz, left over right in dB.
LEAN = [
    [(60, -3), (240, -0.5), (950, -1.5), (3770, 0), (15000, -3)],
    [(60, -1), (240, -1), (950, -1), (3770, 1.5), (15000, -8)],
    [(60, 1), (240, 1.5), (950, -1), (3770, 0.5), (15000, -1)],
]
# Its level, one list per passage. Each row: time in seconds, 250-700 Hz level in dB, treble lift in dB.
SWELL = [
    [(0.0, -57, 0.5), (0.426, -62, 8), (0.936, -61, 16), (1.61, -56.5, -6)],
    [(1.61, -59, 2.5), (2.3, -61, 3), (3.1, -50.5, -5), (3.4, -58, -6.5), (4.44, -55.5, -3.5)],
    [(4.44, -43, 1), (4.7, -44, 2.5), (5.33, -41, 3.5), (6.0, -43, 2.5), (7.15, -44.5, 0.5)],
]
# Whole band over the 250-700 Hz band: dB for each passage.
BASS_SHARE_DB = (13.5, 14.5, 13.5)
# How blotchy the noise is: dB for each passage.
PATCHY_DB = (2, 1.5, 0.75)
# Hums beside the engine, one list per passage. Each row: pitch in Hz, width in Hz, level in dB.
HUM = [
    [(72.35, 2.1, -47.5), (220.4, 3.62, -61)],
    [],
    [(39.86, 1.7, -39), (77.5, 4.8, -39), (226.53, 8, -36)],
]


def air(k):
    """Random short-time spectra in drifting patches, mid and side, plus any narrow hums of passage k."""
    s, t, _ = span(SWELL[k], *PASSAGES[k:k + 2])
    frames = len(t) // 512 + 5
    hz = np.fft.rfftfreq(2048, 1 / SR)[:, None]
    a, b, c, d, patches = rng.standard_normal((frames, 1025, 5)).T
    patches = evened(uniform_filter1d(uniform_filter1d(patches, size=16, axis=0), size=6, axis=1))
    at, level_db, lift_db = np.transpose(SWELL[k])
    lift_db = np.interp(s + np.arange(frames) * 512 / SR, at, lift_db) * hz / (hz + 1000)
    mid = a + 1j * b
    side = (c + 1j * d) * convert_level_to_amplitude(read(WIDTH[k], hz))
    lean = convert_level_to_amplitude(read(LEAN[k], hz) / 2)
    z = np.array([(mid + side) * lean, (mid - side) / lean])
    z = z * convert_level_to_amplitude(read(AIR[k], hz) + PATCHY_DB[k] * patches)
    # the level is set before the treble lift
    scale = np.sqrt(np.mean(signal.istft(z, nperseg=2048, noverlap=1536)[1] ** 2))
    bed = signal.istft(z * convert_level_to_amplitude(lift_db), nperseg=2048, noverlap=1536)[1][:, :len(t)] / scale
    bed = bed * convert_level_to_amplitude(np.interp(t, at, level_db) + BASS_SHARE_DB[k])
    hums = sum(convert_level_to_amplitude(db) * (fuzzy(t, f, width) + np.sin(2 * np.pi * f * t)) for f, width, db in HUM[k])
    return s, edged(bed + hums)


def scene():
    """Sums dog, water, engines, birds, insects and backgrounds."""
    mix, dog = np.zeros((2, 2, N))
    for s, *row in CLAWS:
        add(dog, s, claw(*row), pan_db=-0.09)
    for s, *row in PAWS:
        add(mix, s, paw(*row), pan_db=-1.6)
    for rows in SCRAPES:
        add(dog, *scrape(rows))
    for s, db in JINGLES:
        add(dog, s, jingle(db))
    add(dog, *rocking())
    for s, *row in DRIPS:
        add(mix, s, drip(*row), pan_db=-1.5)
    add(mix, *trickle(), pan_db=0.5)
    add(mix, *squeak(*SQUEAK))
    add(mix, *engine(IDLE[0], ORDERS[0], *PASSAGES[:2]))
    add(mix, *engine(IDLE[1], ORDERS[1], *PASSAGES[2:]))
    for s, db in TICKS:
        add(mix, s, gear_tick(db))
    add(mix, *insects())
    for k in range(3):
        add(mix, *air(k))
    return mix + ports(dog) + birdsong()


def top_cut(x):
    """Nothing passes above the cut-off."""
    return signal.sosfilt(signal.butter(12, 15870, fs=SR, output="sos"), x)


def record(dry):
    """Takes the finished mix as it stands, with no further room or microphone colour."""
    return top_cut(dry)


dry = scene()
out = record(dry)
put_to_file(out)
```